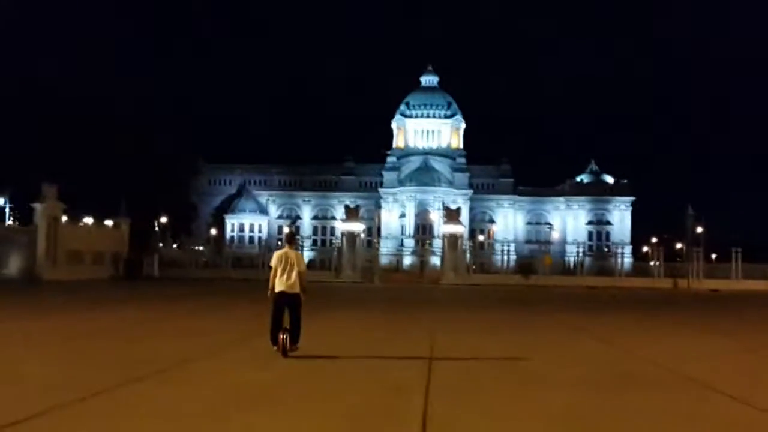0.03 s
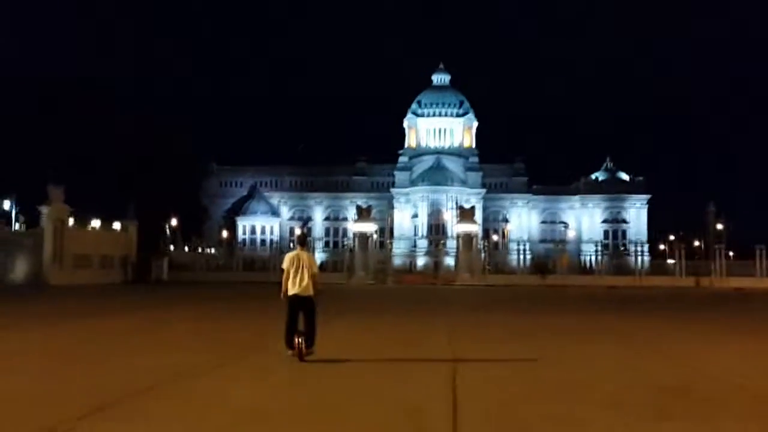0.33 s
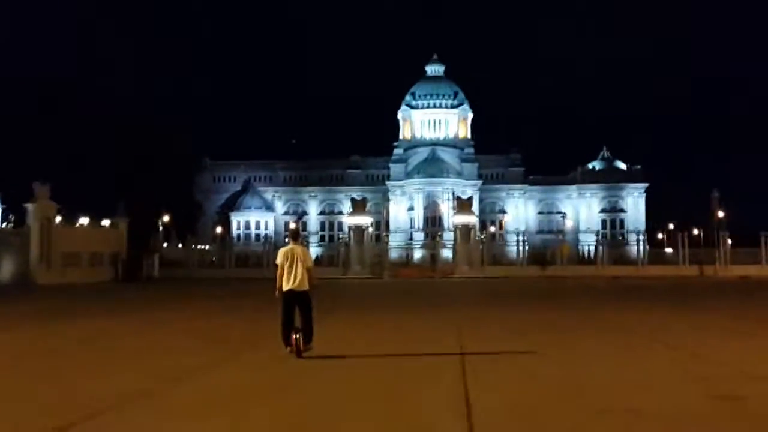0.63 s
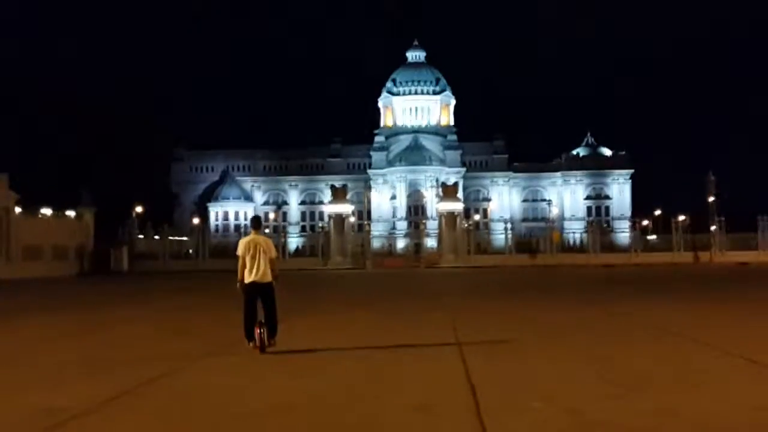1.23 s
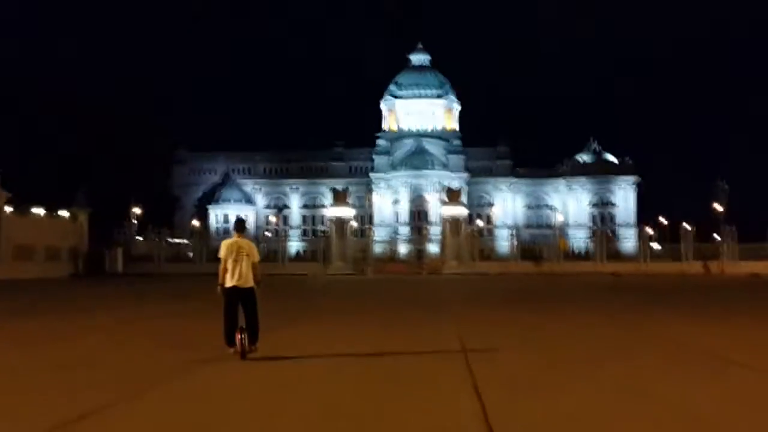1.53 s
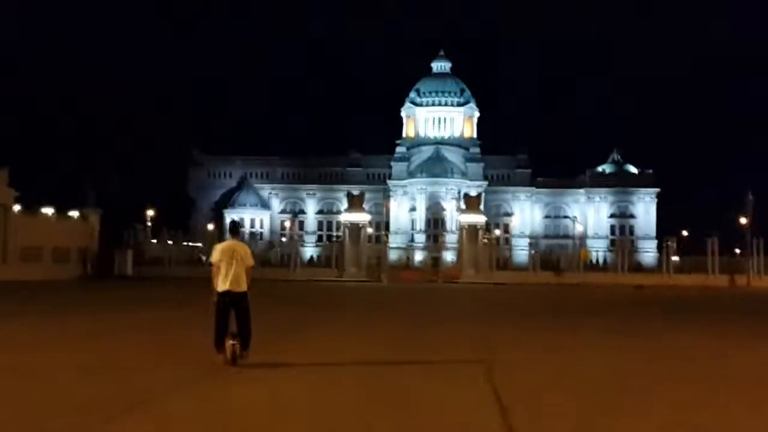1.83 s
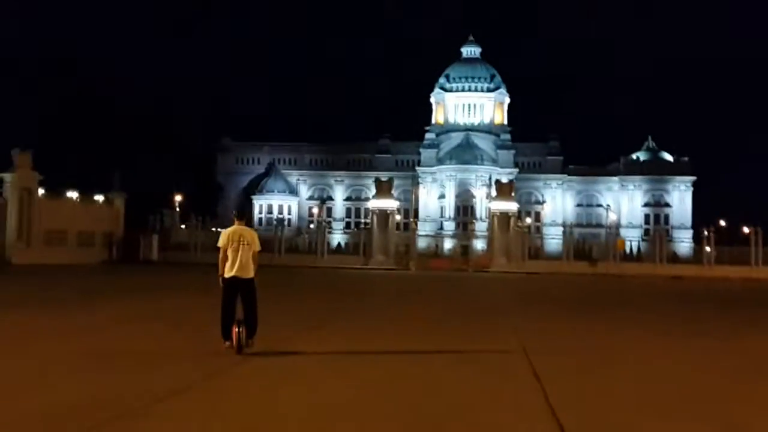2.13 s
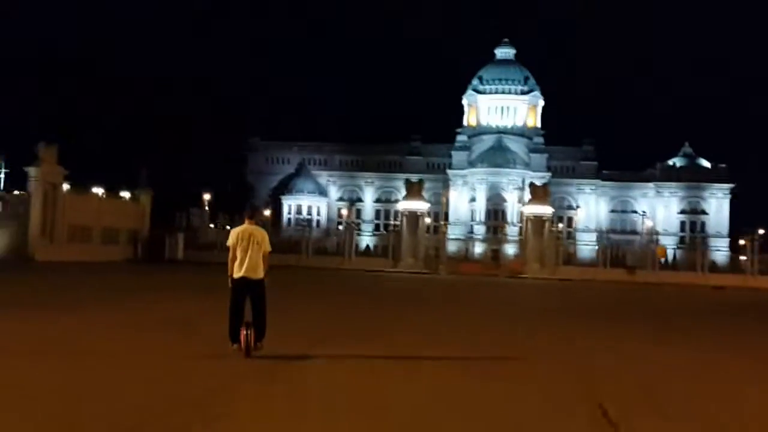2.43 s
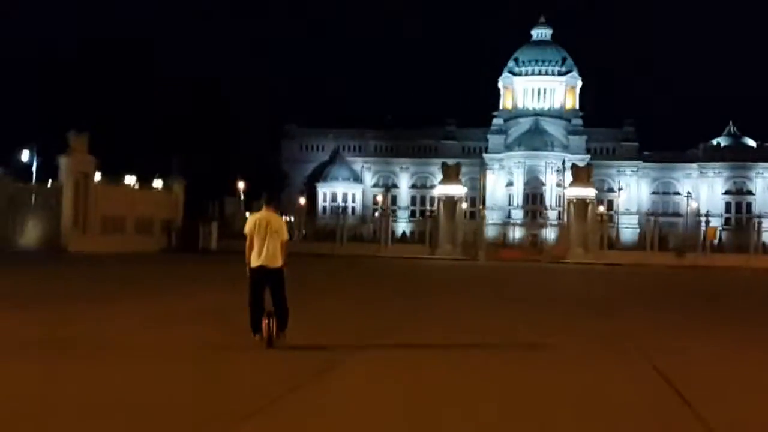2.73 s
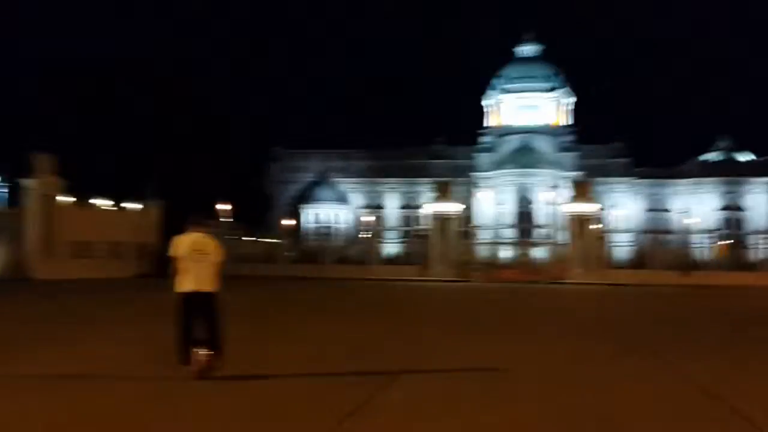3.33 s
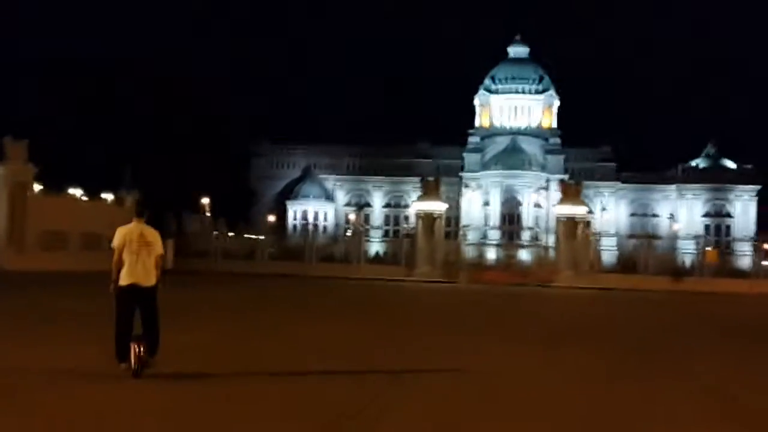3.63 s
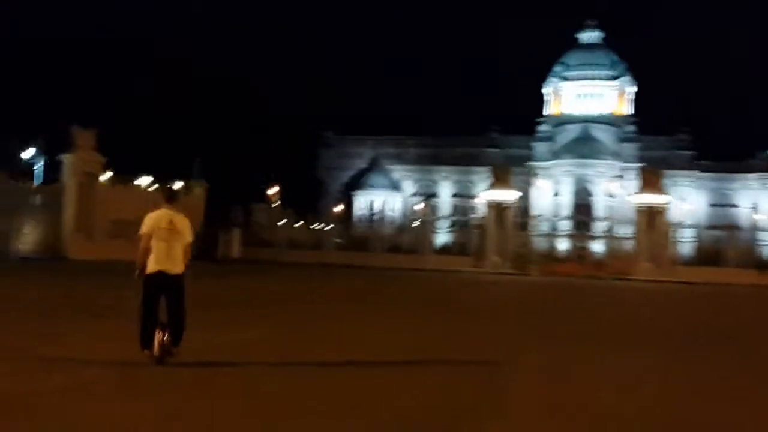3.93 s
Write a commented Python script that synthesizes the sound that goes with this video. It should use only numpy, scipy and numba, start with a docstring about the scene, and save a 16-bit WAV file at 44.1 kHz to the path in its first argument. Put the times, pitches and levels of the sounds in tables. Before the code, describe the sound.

An electric unicycle's motor whines high and steady under gusty wind rumbling on the microphone.

```python
"""An electric unicycle's hub motor whines as it rolls across an open square at night.
Modulation at the motor's speed spreads sidebands around the drive's switching tone, and they swell
once per wheel turn. Turbulent gusts buffet the left microphone over a wash of distant traffic.
The right channel is almost dead: a trace of wind and whine in electronic hiss."""
import sys
import numpy as np
from scipy import signal
from scipy.fft import rfft, irfft
from scipy.io import wavfile
from scipy.ndimage import uniform_filter1d, minimum_filter1d
from numba import njit

SR = 44100
rng = np.random.default_rng(int(sys.argv[2]) if len(sys.argv) > 2 else 0)


def wav_record(signal):
    """Record a signal, one row per channel, as 16-bit PCM in the file named by sys.argv[1]."""
    frames = np.transpose(np.atleast_2d(signal))
    bounded = np.clip(frames, -1, 1)
    # unit amplitude maps onto the largest positive 16-bit level
    quanta = np.round(bounded * 32767).astype(np.int16)
    wavfile.write(sys.argv[1], SR, quanta)


N = 176400

# Spectra give relative power density; gust and whine levels are contours to which offsets are added.
# spectrum of the electronic hiss: frequency_hz, level_db
HISS_SPECTRUM = [(30, 5.5), (800, 3.5), (4800, 4), (7000, 0.5), (14500, 0.5)]
# spectrum of distant traffic and rolling noise: frequency_hz, level_db
TRAFFIC_SPECTRUM = [(60, 3.5), (300, 1), (700, 1), (1000, -9), (1400, -3.5), (1620, -12), (1850, -0.5),
                    (2120, -8), (2300, -5), (2450, -7.5), (2620, -6.5), (3300, -14.5), (5400, -15),
                    (6000, -22.5), (6800, -22), (7500, -29), (8200, -29), (9200, -33), (9700, -42.5),
                    (14500, -59)]
# brief wavering hums from the motor shell and distant traffic: pitch_hz, level_db, loudest_s, spread_s
PASSING_HUMS = [(1930, -71, 1.4, 0.54), (1890, -51, 2.85, 0.27), (2000, -61, 2, .2), (1000, -44, 3.8, .25)]
# wind in the right channel: time_s, level_db
RIGHT_GUSTS = [(0, -51.5), (.55, -58), (.7, -43), (.85, -54), (1.1, -55.5), (1.3, -49), (2.55, -57.5),
               (4, -53.5)]
# spectrum of that wind: frequency_hz, level_db
RIGHT_WIND_SPECTRUM = [(20, -13.5), (45, -6), (80, 0.5), (130, -2), (750, -23.5), (2000, -42.5)]
# wind on the left microphone: time_s, rumble_db, buffet_db
LEFT_GUSTS = [(0, -16.5, -26.5), (.18, -32.5, -26.5), (.27, -20, -28), (.38, -22.5, -24), (.47, -22, -24),
              (.57, -23, -36), (.68, -27, -30.5), (.72, -21, -39), (.78, -27, -40.5), (.85, -22.5, -31),
              (.93, -20.5, -37.5), (1.01, -28, -32), (1.05, -25.5, -21.5), (1.11, -15.5, -27),
              (1.17, -28, -36.5), (1.38, -28.5, -41.5), (1.48, -25.5, -30), (1.55, -18, -28.5),
              (1.62, -24.5, -39.5), (1.8, -24, -36), (2.02, -21.5, -31), (2.15, -18.5, -30),
              (2.38, -19.5, -24), (2.58, -23, -25.5), (2.66, -34.5, -51), (2.72, -26, -26),
              (2.84, -17.5, -32), (2.94, -28.5, -40.5), (3.02, -22.5, -27.5), (3.08, -23, -42.5),
              (3.19, -25, -30.5), (3.235, -26, -27), (3.27, -24, -43.5), (3.38, -41, -28),
              (3.44, -21.5, -38.5), (3.51, -32.5, -44), (3.59, -32, -39.5), (3.64, -23, -33.5),
              (3.7, -29.5, -42), (4, -20.5, -39)]
# spectrum of the rumble: frequency_hz, level_db
RUMBLE_SPECTRUM = [(15, -39), (30, -35), (50, -13.5), (75, -2.5), (115, 3), (170, 0.5), (250, -1),
                   (350, -6.5), (500, -29), (900, -50), (3000, -89)]
# spectrum of the buffeting before its low-pass: frequency_hz, level_db
BUFFET_SPECTRUM = [(40, -34.5), (150, 4), (300, -0.5), (450, 1), (700, -7.5), (1000, -13), (1500, -37.5),
                   (2200, -31), (4000, -71)]
# single hard eddies: centre_s, strength_db, half_length_s
HARD_EDDIES = [(0.102, -16.5, 0.0002), (0.117, -8, 0.00023), (0.147, -3.5, 0.00051), (0.179, 2, 0.00034),
               (0.197, -4.5, 0.00027), (0.263, 5, .0011), (.27, 4.5, .0011), (0.299, -10.5, 0.00027),
               (0.324, -10, 0.00048), (.46, -1.5, 0.00044), (0.537, -7.5, 0.00041), (.614, -7.5, .0004),
               (0.633, -12, .00048), (0.672, -9.5, 0.00029), (.747, 3.5, 0.0004), (0.798, -12.5, 0.0003),
               (.827, -12.5, .00026), (0.9, -10.5, 0.00031), (0.949, -12, 0.0004), (0.975, -4.5, 0.00038),
               (1, -7, 0.00055), (1.055, -9, 0.0002), (1.089, 5, 0.00053), (1.11, -4.5, 0.00037),
               (1.141, 0.5, 0.00095), (1.423, 4, 0.0011), (1.707, -12, 0.00051), (2.038, -5, 0.00047),
               (2.049, -7.5, 0.0003), (2.301, -8, 0.00025), (2.355, -7.5, 0.00031), (2.378, 1, 0.00029),
               (2.411, -8, 0.00024), (2.466, 3, 0.0015), (2.565, 2, 0.0004), (2.82, -7, 0.00049),
               (3.236, -11.5, 0.00048), (3.648, -8, .00094), (3.774, -7.5, 0.00069)]
# electrical frequency of the motor: time_s, speed_hz
MOTOR_SPEED = [(0, 118.2), (.4, 119.7), (.95, 119.3), (1.1, 117.8), (1.8, 121.8), (2.0, 121.8),
               (2.45, 119.1), (3.1, 118.6), (3.4, 116.3), (3.6, 113.2), (4, 108.6)]
# contours of the whine: time_s, main_tone_db, low_sideband_db, upper_tones_db
WHINE_LEVELS = [(0, -42.5, -51, -57), (.25, -43.5, -52, -60.5), (.65, -45, -50.5, -54),
                (1.0, -45.5, -53, -56), (1.45, -41.5, -47, -54.5), (1.78, -41, -49, -53),
                (1.95, -40.5, -48.5, -59), (2.15, -40, -57, -60.5), (2.42, -45.5, -57.5, -55),
                (2.68, -37, -52.5, -59), (2.95, -40, -55, -54.5), (3.2, -39, -55, -53.5),
                (3.42, -41, -64, -54.5), (3.55, -40, -61, -54.5), (4, -46.5, -67, -55.5)]
# sidebands, each at the switching tone plus order times motor speed: order, whine_levels_column
SIDEBANDS = [(-3, 1), (-5, 1), (-1, 1), (-7, 1), (-11, 2), (1, 3), (3, 3), (5, 3), (0, 3), (2, 3), (9, 2)]
# the same sidebands, row for row: offset_db, swell_db, swell_time_s, roughness_ratio
SIDEBAND_MODULATION = [(0.5, 2, 0.11, 0.15), (-20, 1.5, 0.054, 1), (-17.5, 3.5, .02, .05),
                       (-29.5, 5, .1, .4), (0, 0, .14, 0.44), (-0.5, 2, 0.16, 0.4), (-3, -2.5, 0.11, 0),
                       (-4, 1.6, 0.088, 0.4), (-24, -1, .1, .1), (-21, -2, .1, .1), (-25, -5, 0.12, 0.8)]
# faint tones around twice the switching tone: order
OCTAVE_ORDERS = [-6, -2, 0]
# rough upper sidebands that ring in the motor shell: order
RING_ORDERS = [9, 15, 21, 23]
# spectrum of the shell's sizzle: frequency_hz, level_db
SHELL_SPECTRUM = [(6700, -25), (7100, 9.5), (7500, -4), (8200, -11), (8550, -8.5), (9300, -9), (9800, -27),
                  (14000, -46)]

SWITCH_HZ, CYCLES_PER_TURN, POLE_ORDER = 6000, 22, 22
GUST_REFERENCE_DB = -22.5  # gust strength at which the snap rate and buffet cutoff are stated
TIME_S = np.arange(N) / SR


def undb(db):
    """Amplitude grows tenfold for every 20 decibels."""
    return 10 ** (np.asarray(db) / 20)


def curve(rows, column=1):
    """Linear interpolation gives one column of a time table at every sample."""
    rows = np.array(rows)
    return np.interp(TIME_S, rows[:, 0], rows[:, column])


def noise(spectrum):
    """Spectral shaping turns white noise into coloured noise of rms 1."""
    hz, db = np.array(spectrum).T
    bins_hz = np.maximum(np.arange(N // 2 + 1) * SR / N, 1)
    gain = undb(np.interp(np.log(bins_hz), np.log(hz), db))
    coloured = irfft(rfft(rng.standard_normal(N)) * gain, N)
    return coloured / coloured.std()


def drift(rate_hz):
    """Low-passed noise of rms 1 fluctuates smoothly, about rate_hz times a second."""
    bins_hz = np.arange(N // 2 + 1) * SR / N
    gain = np.exp(-(2 * bins_hz / rate_hz) ** 2) * (bins_hz > 0)
    smooth = irfft(rfft(rng.standard_normal(N)) * gain, N)
    return smooth / smooth.std()


@njit
def lowpass(x, cutoff_hz):
    """Two integrators in a feedback loop form a low-pass with a moving cutoff."""
    low, band_state, low_state = np.empty(len(x)), 0., 0.
    for i in range(len(x)):
        g = np.tan(np.pi * cutoff_hz[i] / SR)
        band = (band_state + g * (x[i] - low_state)) / (1 + g * (g + np.sqrt(2.)))
        low[i] = low_state + g * band
        band_state, low_state = 2 * band - band_state, 2 * low[i] - low_state
    return low


@njit
def peak_hold(x, decay):
    """An envelope follower rises at once to each peak and decays exponentially."""
    envelope, held = np.empty(len(x)), 0.
    for i in range(len(x)):
        held = max(abs(x[i]), held * decay)
        envelope[i] = held
    return envelope


def traffic(wash_db=-38):
    """Many distant sources add incoherently into an even wash whose level flickers."""
    return noise(TRAFFIC_SPECTRUM) * undb(wash_db + drift(39))


def passing_hums(pitch_wander=.004):
    """Brief hums from the motor shell and distant traffic waver by random frequency modulation."""
    out = np.zeros(N)
    for pitch_hz, level_db, loudest_s, spread_s in PASSING_HUMS:
        envelope = undb(level_db) * np.exp(-((TIME_S - loudest_s) / spread_s) ** 2)
        phase = 2 * np.pi * pitch_hz * np.cumsum(1 + pitch_wander * drift(40)) / SR
        out += envelope * np.sin(phase)
    return out


def crackle(force_db, snaps_per_s=280, band_hz=(830, 1660)):
    """Tiny eddies snap at the microphone port as a Poisson process whose rate rises with the gust."""
    rate_hz = snaps_per_s * undb(force_db - GUST_REFERENCE_DB)
    snaps = np.sign(rng.standard_normal(N)) * (rng.random(N) < rate_hz / SR)
    port = signal.butter(3, band_hz, "band", fs=SR, output="sos")
    return signal.sosfilt(port, snaps) * undb(-3)


def wind(wake_s=.0036, reference_cutoff_hz=836, octaves_per_db=-.04):
    """Turbulent pressure rumbles and buffets; the buffeting's cutoff falls as its strength rises."""
    puffs_db = 2.5 * drift(45.4)
    rumble = noise(RUMBLE_SPECTRUM) * undb(curve(LEFT_GUSTS, column=1) + 6.5 + puffs_db)
    # each hard eddy briefly stirs up the air around it
    wakes = [np.exp(-((TIME_S - centre_s) / wake_s) ** 2) for centre_s, _, _ in HARD_EDDIES]
    churn_db = 3 * np.max(wakes, axis=0) + 4 * drift(256)
    force_db = curve(LEFT_GUSTS, column=2) + puffs_db + churn_db
    cutoff_hz = reference_cutoff_hz * 2 ** (octaves_per_db * (force_db - GUST_REFERENCE_DB))
    buffet = lowpass(noise(BUFFET_SPECTRUM) * undb(force_db + 8), np.clip(cutoff_hz, 200, 5000))
    return rumble + buffet + crackle(force_db)


def eddy(centre_s, strength_db, half_length_s):
    """An eddy carried across the microphone makes a bipolar pressure pulse, up then down."""
    position = np.clip((TIME_S - centre_s) / half_length_s, -10, 10)
    return -undb(strength_db) * position * np.exp(.5 * (1 - position ** 2))


def vortex_train(centre_s=3.385, spread_s=.073, shedding_hz=94):
    """Vortex shedding at the microphone gives nearly periodic pulses that swell and fade."""
    out = np.zeros(N)
    for k, (lateness, size) in enumerate(rng.standard_normal(size=(20, 2))):
        offset_s = (k - 10 + .1 * lateness) / shedding_hz
        pulse = eddy(centre_s + offset_s, strength_db=-6 + 2 * size, half_length_s=.00061)
        out += pulse * np.exp(-(offset_s / spread_s) ** 2)
    return out


def thuds(bass_cut_hz=130):
    """The microphone's high-pass response makes each hard eddy and shed vortex overshoot."""
    pressure = sum(eddy(*row) for row in HARD_EDDIES) + vortex_train()
    return signal.sosfilt(signal.butter(2, bass_cut_hz, "high", fs=SR, output="sos"), pressure)


def wheel_swell(cycles, crest_s):
    """Rotation modulates the level once per wheel turn; one crest of the cosine falls at crest_s."""
    turns = (cycles - np.interp(crest_s, TIME_S, cycles)) / CYCLES_PER_TURN
    return np.cos(2 * np.pi * turns)


def pole_hum(cycles):
    """The passing magnet poles hum at a harmonic of the motor's electrical frequency."""
    return undb(-59 + 1.5 * drift(23)) * np.sin(2 * np.pi * POLE_ORDER * cycles)


def shell_sizzle(cycles, ring_db=-7.5):
    """Forced vibration of the motor shell: noise and rough tones partly follow the low sideband's level."""
    ring = sum(drift(55) * np.sin(2 * np.pi * (SWITCH_HZ * TIME_S + order * cycles))
               for order in RING_ORDERS)
    level_db = -40 + .4 * curve(WHINE_LEVELS, column=2)
    level_db += .5 * wheel_swell(cycles, crest_s=.065) + 1.5 * drift(50)
    return (noise(SHELL_SPECTRUM) + undb(ring_db) * ring) * undb(level_db)


def switching_whine(cycles, waver_db=.86, roughness_hz=110):
    """Modulation sets sidebands at multiples of motor speed from the switching tone and its octave."""
    out = np.zeros(N)
    for (order, column), modulation in zip(SIDEBANDS, SIDEBAND_MODULATION):
        offset_db, swell_db, swell_s, roughness = modulation
        level_db = curve(WHINE_LEVELS, column) + offset_db
        level_db += swell_db * wheel_swell(cycles, swell_s) + waver_db * drift(12)
        phase = 2 * np.pi * (SWITCH_HZ * TIME_S + order * cycles + rng.random())
        # a random phasor roughens both amplitude and phase
        flutter = roughness * (drift(roughness_hz) + 1j * drift(roughness_hz)) / np.sqrt(2)
        out += undb(level_db) * np.imag((1 + flutter) * np.exp(1j * phase))
    for order in OCTAVE_ORDERS:
        phase = 2 * np.pi * (2 * SWITCH_HZ * TIME_S + order * cycles)
        out += undb(-85 + 3 * drift(10)) * np.sin(phase)
    return out


def hub_motor(jitter_hz=.594):
    """Phase is the integral of frequency: one electrical cycle count drives hum, whine and sizzle."""
    cycles = np.cumsum(curve(MOTOR_SPEED) + jitter_hz * drift(29.5)) / SR
    tones = pole_hum(cycles) + switching_whine(cycles)
    return np.sqrt(2) * tones + shell_sizzle(cycles)  # a sine peaks at sqrt(2) times its rms


def scene(right_motor_db=-32, hiss_db=-60.5):
    """The sources superpose on the left; the right holds a trace of wind and motor in hiss."""
    motor = hub_motor()
    left = motor + wind() + thuds() + traffic() + passing_hums()
    faint_wind = noise(RIGHT_WIND_SPECTRUM) * undb(curve(RIGHT_GUSTS) + 2.5 * drift(40))
    right = undb(right_motor_db) * motor + faint_wind + undb(hiss_db) * noise(HISS_SPECTRUM)
    return np.array([left, right])


def record(dry, ceiling=.97, release_s=.012, top_hz=14550):
    """Peak limiting ducks both channels under the hardest gusts; a steep low-pass cuts the top."""
    peaks = peak_hold(dry[0], np.exp(-1 / (release_s * SR)))
    gain = np.minimum(1, ceiling / (peaks + 1e-9))
    smooth_gain = uniform_filter1d(minimum_filter1d(gain, size=401), size=401)
    treble_cut = signal.ellip(10, .2, 70, top_hz, fs=SR, output="sos")
    return signal.sosfilt(treble_cut, dry * smooth_gain)


dry = scene()
out = record(dry)
wav_record(out)
```